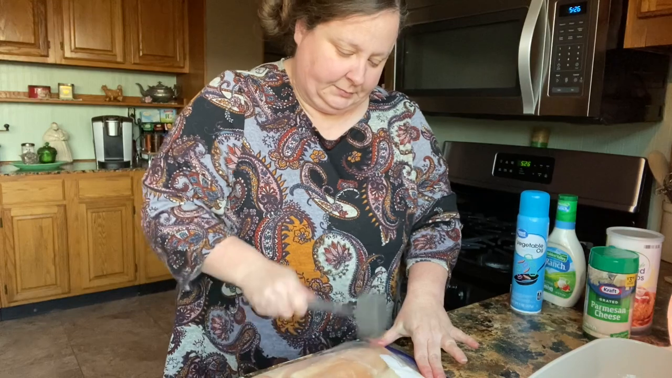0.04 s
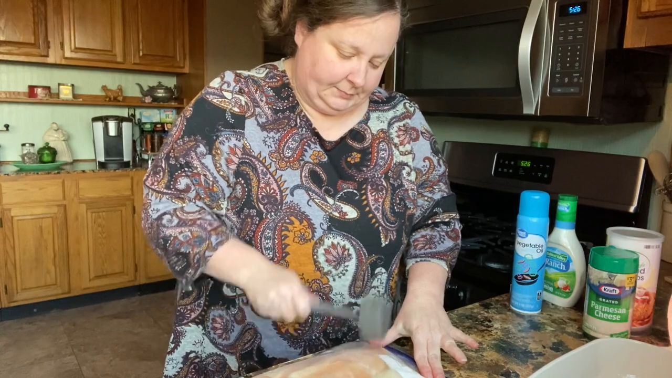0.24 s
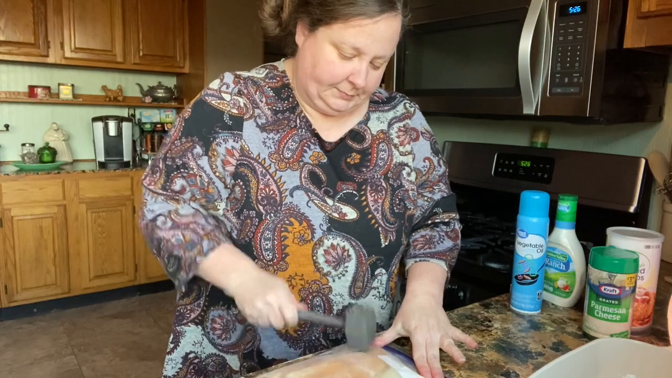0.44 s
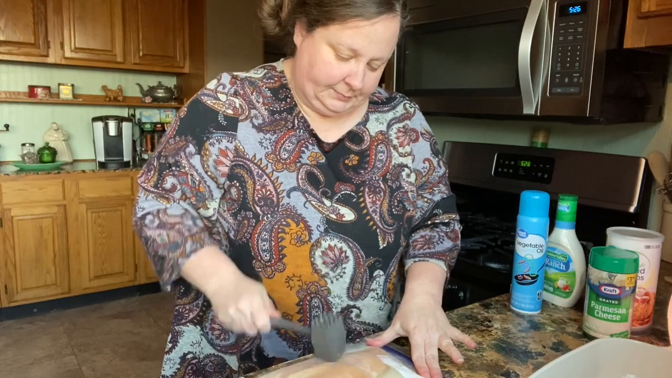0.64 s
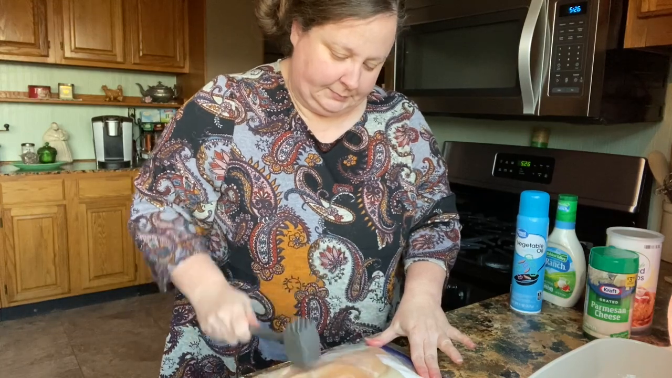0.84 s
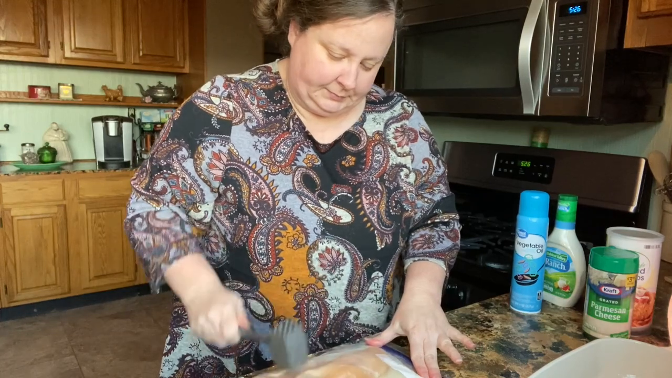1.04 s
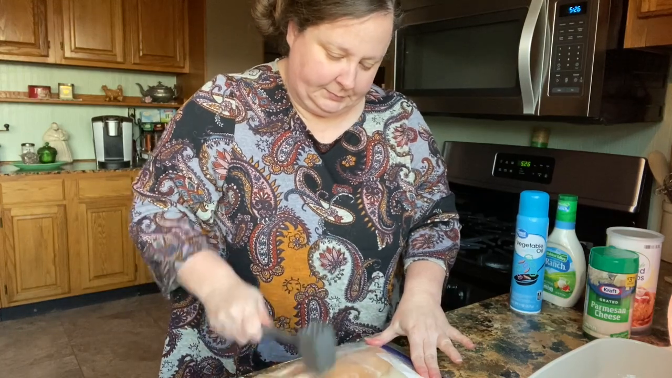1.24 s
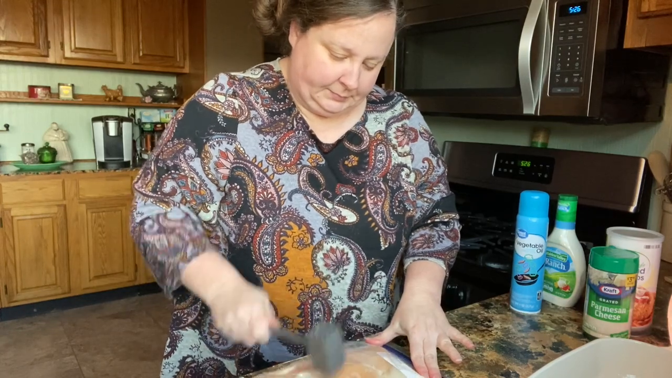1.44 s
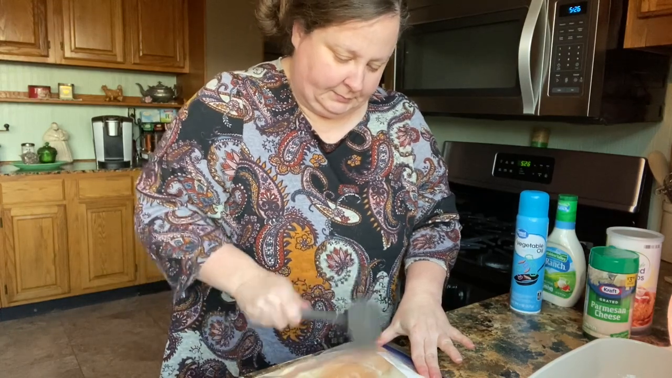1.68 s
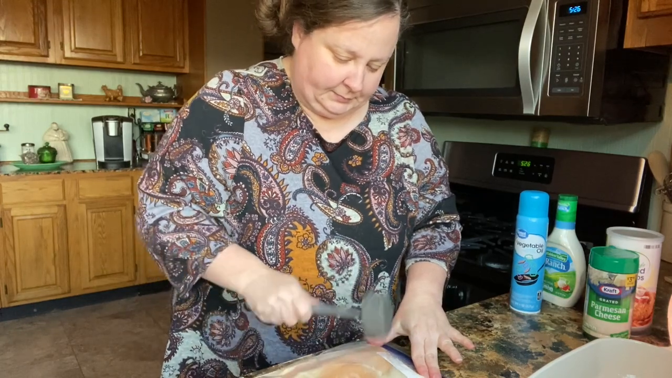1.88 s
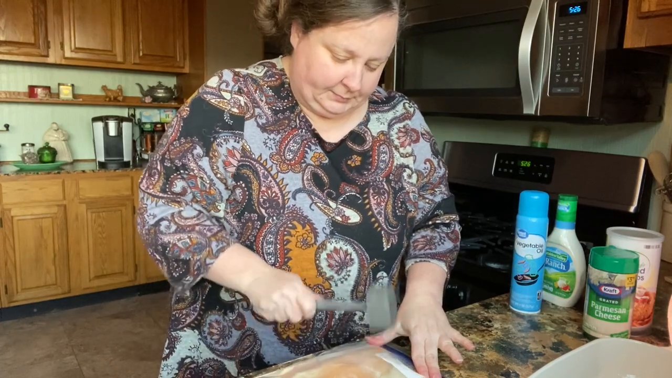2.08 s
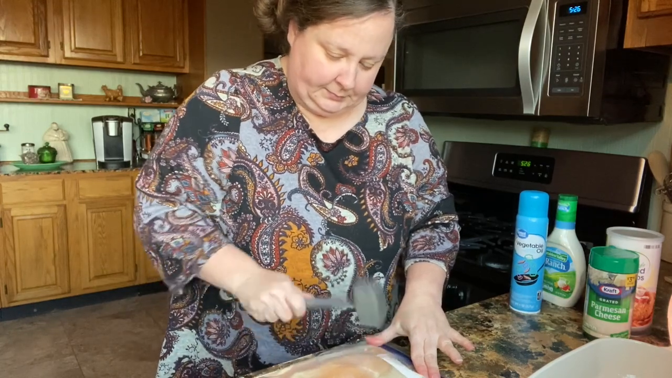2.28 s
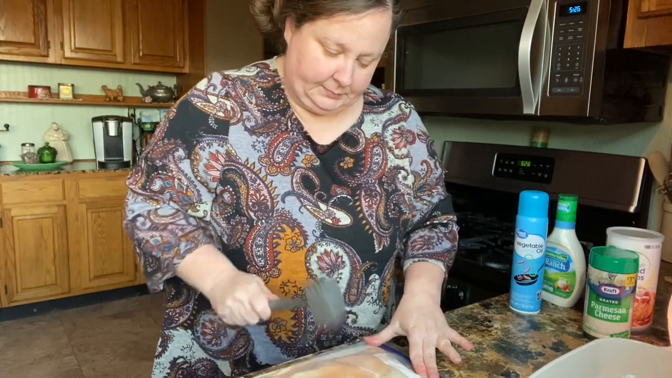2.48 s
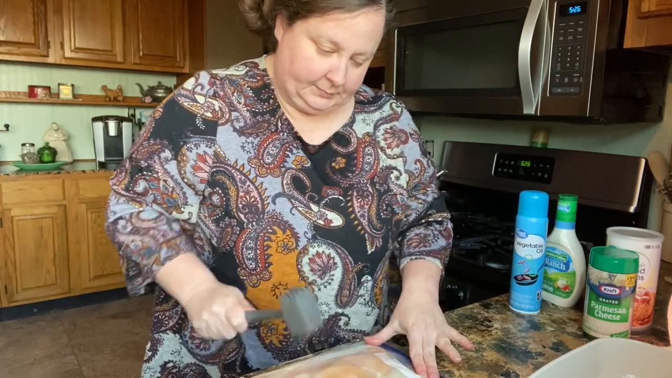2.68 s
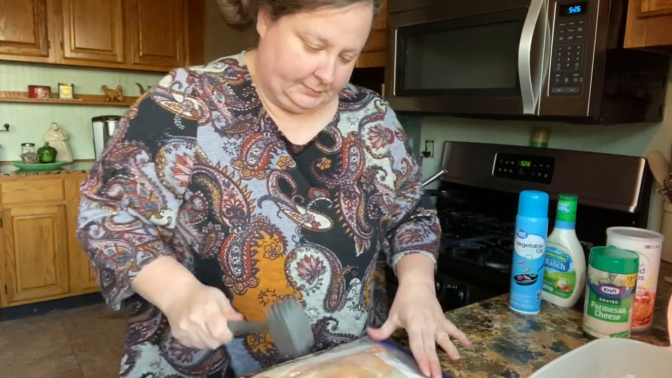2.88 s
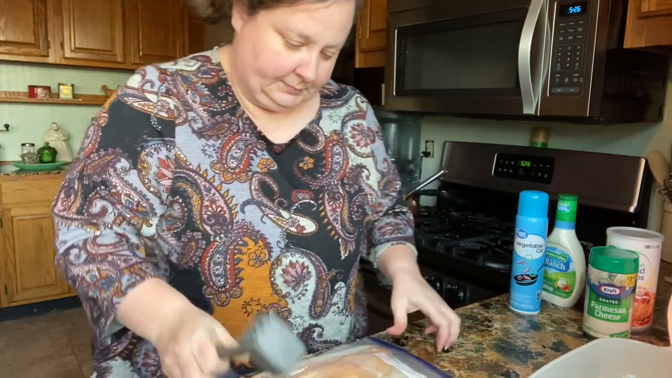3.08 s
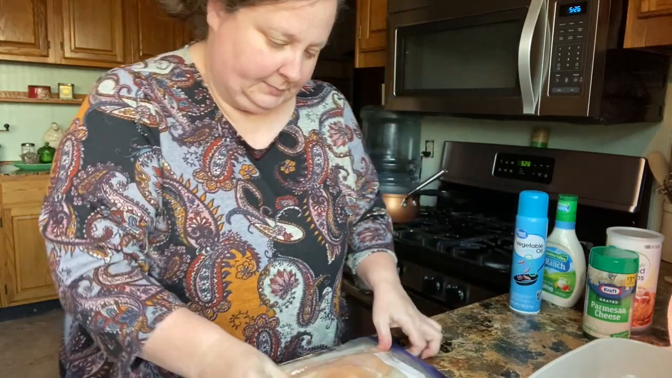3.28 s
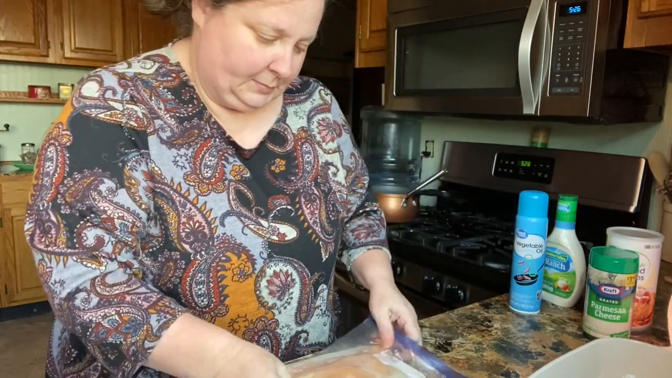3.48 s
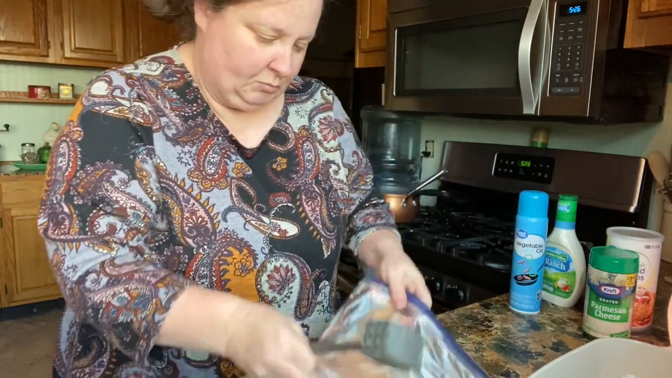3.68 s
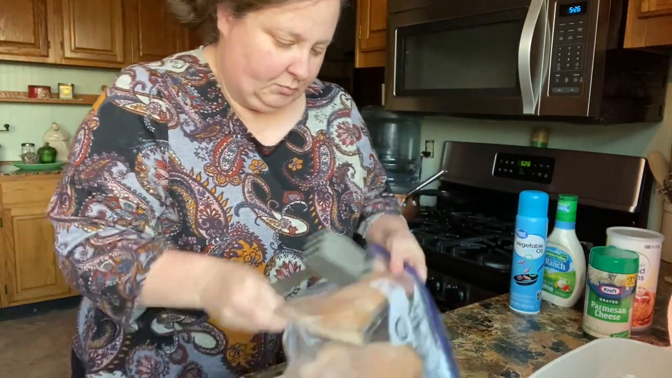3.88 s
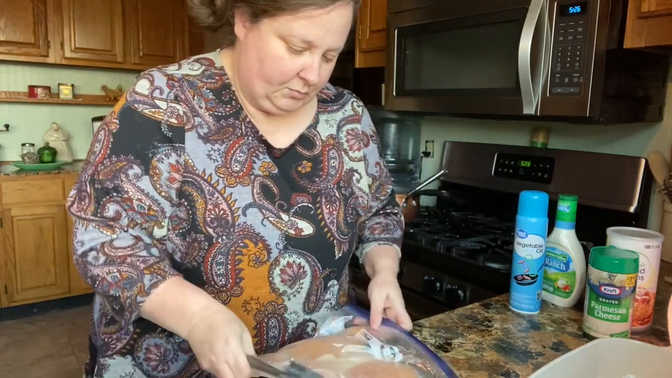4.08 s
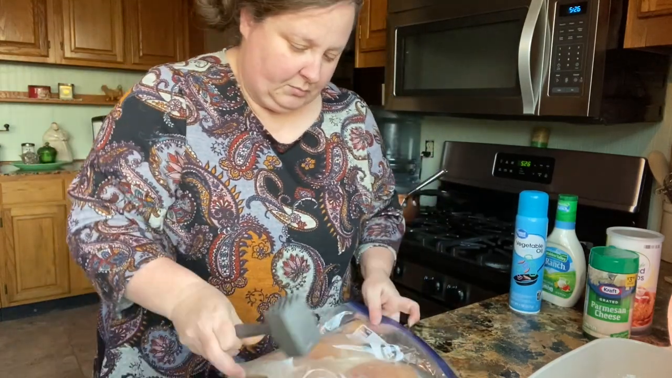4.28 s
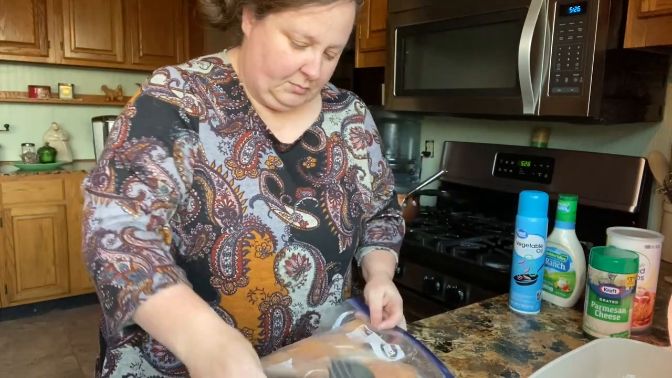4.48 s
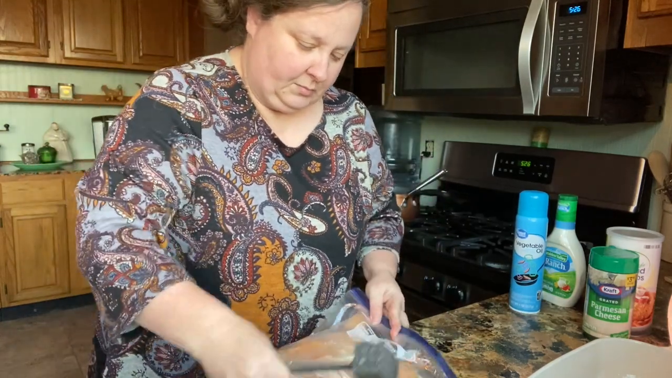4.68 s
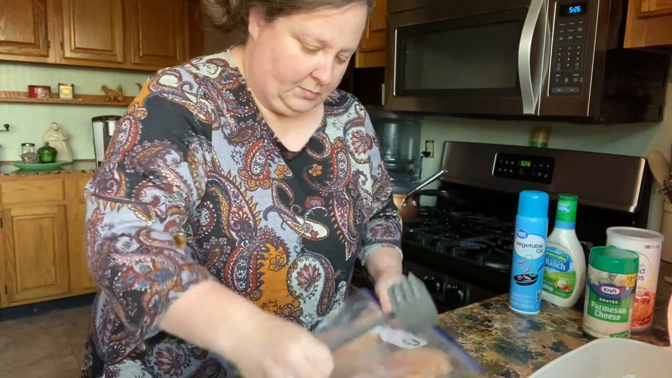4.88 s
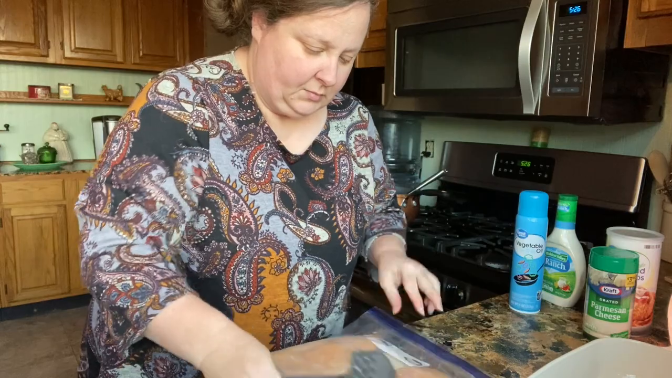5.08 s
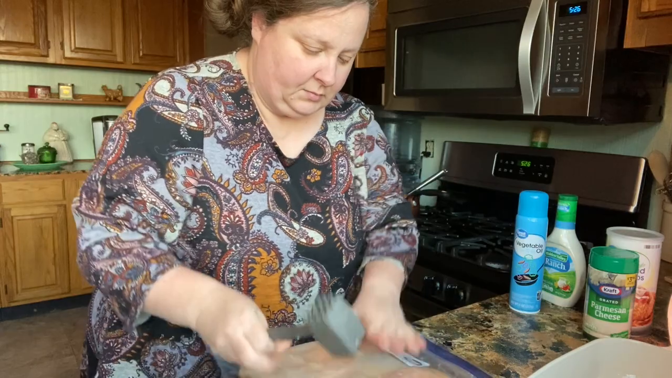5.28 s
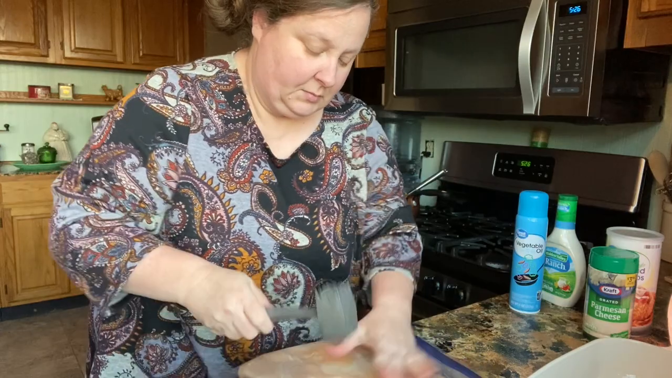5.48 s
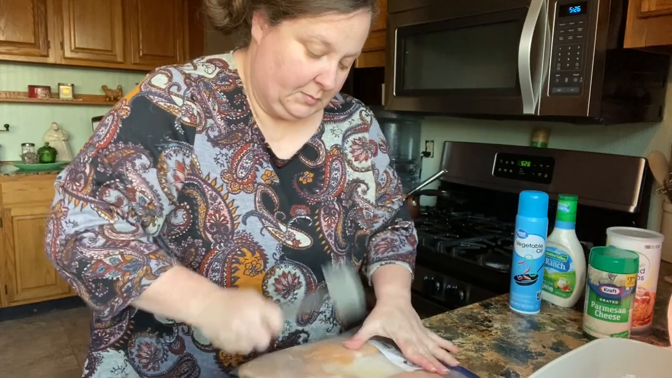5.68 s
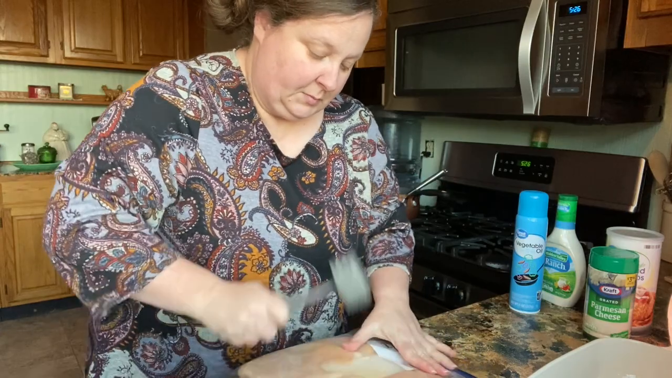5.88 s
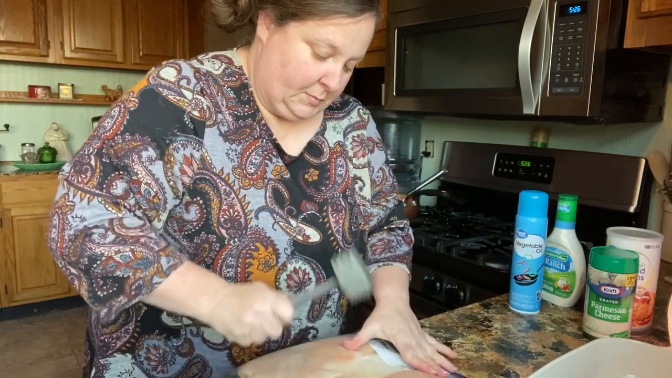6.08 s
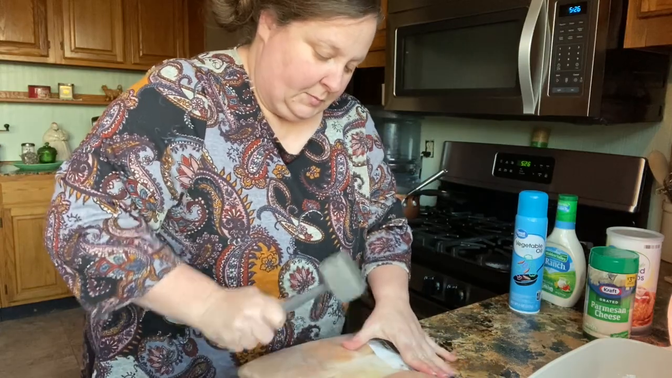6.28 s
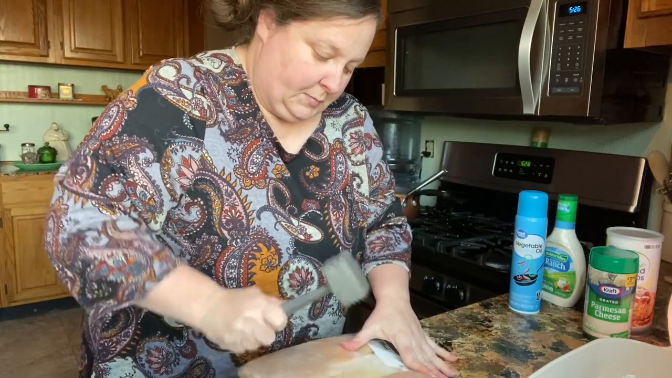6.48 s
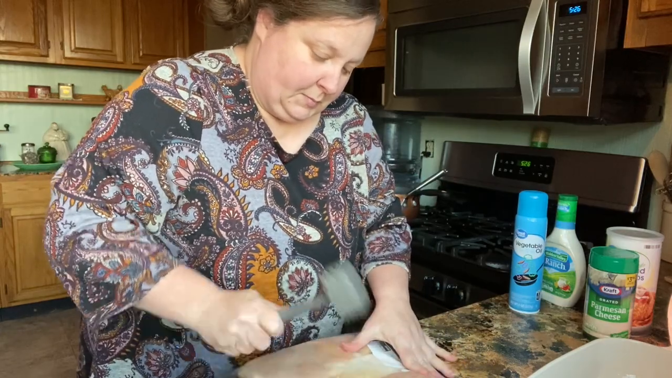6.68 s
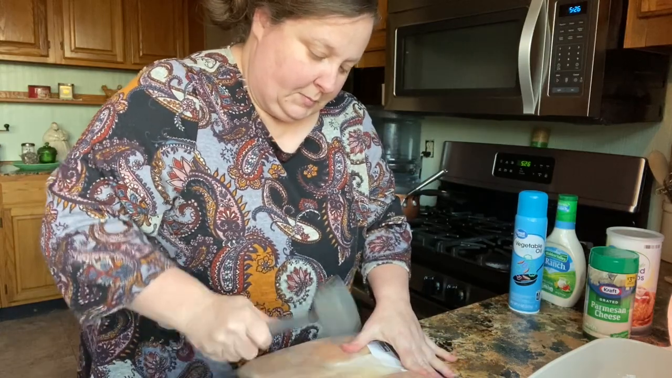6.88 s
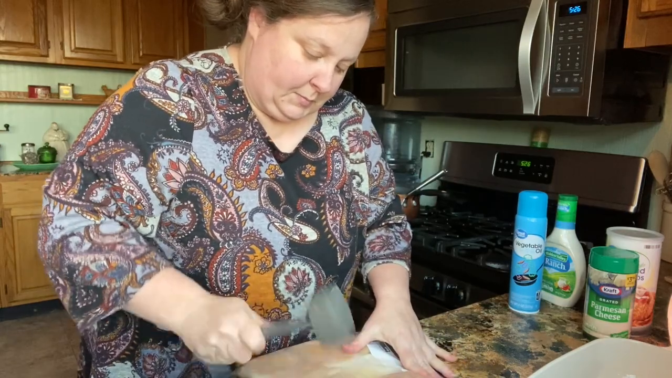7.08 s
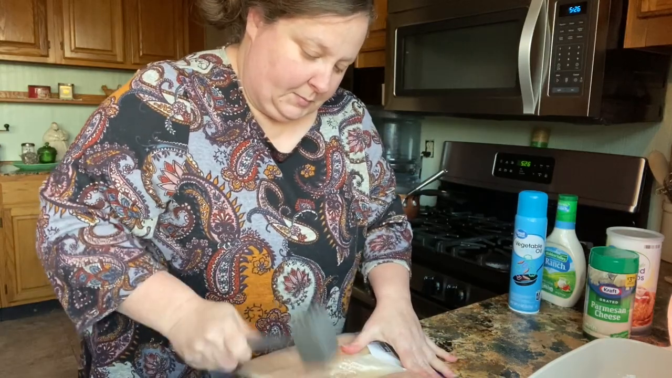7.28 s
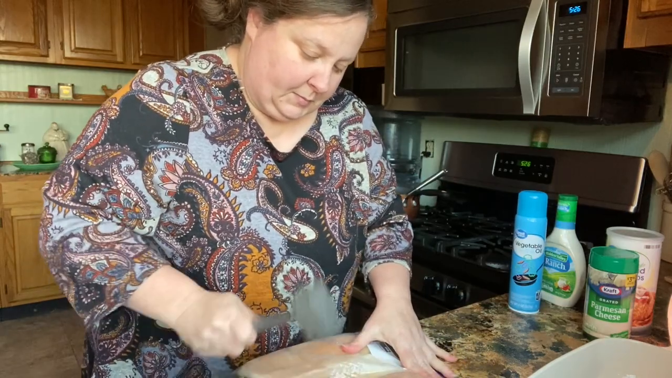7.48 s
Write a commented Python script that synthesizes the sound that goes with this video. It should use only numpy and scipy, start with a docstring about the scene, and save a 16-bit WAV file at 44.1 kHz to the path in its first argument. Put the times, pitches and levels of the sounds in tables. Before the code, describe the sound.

A meat mallet strikes chicken in a plastic bag, about five blows a second, each a wet slap with a woody counter knock and low cabinet boom. The blows weaken and stop; the bag crinkles, snaps and flops softly as it is shifted, with one light tap. Then firm, heavier pounding resumes to the end. Close stereo microphone in a lively kitchen with a faint low murmur.

```python
"""A meat mallet pounds chicken in a plastic bag on a kitchen counter, about five blows a second.
Each blow puffs air from under the film, slaps the meat, then pushes through to the counter and its cabinet.
Between the two runs the bag is lifted, turned and dropped back, crinkling, with one soft blow on the way.
Slaps and crinkles are coloured random clicks, knocks and booms are ringing modes, the thump is a smooth pulse.
A lively kitchen answers it all with decaying noise, over a quiet low murmur."""
import sys
import numpy as np
from scipy import signal
from scipy.fft import rfft, irfft, next_fast_len
from scipy.io import wavfile
from scipy.ndimage import uniform_filter1d

SR = 44100
rng = np.random.default_rng(int(sys.argv[2]) if len(sys.argv) > 2 else 0)


def wrap_up_sound(samples):
    """Save the sound to the file named by the first command line argument, as 16-bit audio."""
    columns = np.atleast_2d(samples).T
    # keep every value between -1 and 1, then stretch to whole-number steps
    tamed = np.clip(columns, -1, 1)
    steps = np.round(tamed * 32767).astype(np.int16)
    wavfile.write(sys.argv[1], SR, steps)


N = 332543   # samples in the scene

# murmur of the still kitchen: (frequency [Hz], relative density [dB])
MURMUR = [(25, -22.5), (50, -8), (76, 1), (115, -12.5), (300, -11), (420, -11), (700, -25.5), (2300, -37),
          (7600, -48), (11000, -73.5), (15000, -82.5)]
# mallet blows: (time [s], slap level [dB], level of the puff of trapped air [dB], thump level [dB], air pocket [Hz])
BLOWS = [(-0.1, -11.5, -24, -21.5, 966), (0.1098, -11.5, -22.5, -19.5, 930),
         (0.3224, -13.5, -22, -23.5, 920), (0.5305, -13.5, -22.5, -19.5, 920),
         (0.739, -18.5, -18.5, -20.5, 970), (0.9409, -16, -18, -21, 2540), (1.1359, -23, -36, -24.5, 2250),
         (1.333, -21.5, -42, -19, 840), (1.5358, -12, -18, -17, 2500), (1.7337, -13.5, -27.5, -22, 1000),
         (1.9202, -17, -31, -25, 2120), (2.1174, -23, -27.5, -30.5, 2290),
         (2.309, -18.5, -25.5, -19.5, 880), (2.505, -24, -38, -27.5, 800), (2.6796, -27, -54, -34, 2070),
         (5.272, -31.5, -40.5, -46.5, 2270), (5.66, -16, -23.5, -17, 1800),
         (5.866, -11.5, -23, -15.5, 2600), (6.073, -13, -23.5, -16.5, 2150),
         (6.2823, -10.5, -15, -15.5, 1290), (6.483, -13, -18, -14.5, 2060), (6.6966, -11, -17.5, -13, 900),
         (6.8981, -12.5, -19, -11.5, 1940), (7.107, -16, -18, -12.5, 2300),
         (7.3241, -13.5, -19.5, -13.5, 2880), (7.5069, -14, -22, -15, 2130)]
# wet film under the mallet, before brightening: (frequency [Hz], relative density [dB])
WET_FILM = [(250, -0.5), (500, 1.5), (700, -8.5), (930, 3), (1200, -3.5), (1700, -1), (2400, 1),
            (3300, -4.5), (4300, -4), (5400, -8), (6700, -9.5), (8800, -11), (10700, -21), (13500, -21.5),
            (15000, -32), (16500, -55.5)]
# modes of the counter top: (frequency [Hz], relative level [dB], t60 [s])
COUNTER_MODES = [(208.3, -10, 0.037), (265.4, -1.5, 0.042), (302.5, -0.5, 0.046), (344.3, 0, 0.055),
                 (399.6, -2.5, 0.056), (474.3, -7.5, 0.066), (958, -6.5, 0.039)]
# modes of the cabinet under it: (frequency [Hz], relative level [dB], t60 [s])
CABINET_MODES = [(59.2, 2, 0.31), (71.5, -7.5, 0.26), (83.1, -7.5, .27), (114, -6.5, 0.12),
                 (141, -9.5, .16)]
# a dish on the counter rings along: (frequency [Hz], relative level [dB], t60 [s])
DISH_MODES = [(706, 0, 0.36)]
# the bag slaps back as the mallet rebounds: (time [s], level before the rebound trim [dB])
REBOUNDS = [(0.7791, -18.5), (1.1887, -16.5), (1.3789, -15.5), (2.7267, -19.5), (5.7059, -13),
            (6.93, -13.5), (7.3588, -11)]
# moves of the hand on the bag (let go, grab, lift, turn, smooth): (time [s], length [s], strain level [dB])
MOVES = [(2.811, .07, -61), (3.159, 0.28, -55), (3.438, 0.23, -46.5), (3.789, 0.15, -40),
         (4.053, 0.13, -59), (4.367, 0.33, -54.5), (4.641, 0.12, -43.5), (4.805, 0.12, -40),
         (5.054, 0.12, -55), (5.283, 0.054, -44), (5.54, 0.038, -59.5)]
# dry film crinkling: (frequency [Hz], relative density [dB])
DRY_FILM = [(400, -8.5), (1200, -1), (2500, 3), (3500, 1.5), (8500, -3.5), (10700, -5), (13800, -11.5),
            (15200, -15), (16500, -35)]
# film sliding on the counter: (frequency [Hz], relative density [dB])
SLIDING_FILM = [(60, -3), (350, 0), (650, -8.5), (900, -3.5), (1500, -10), (2500, -5.5), (4000, -25.5)]
# the loudest creases that snap: (time [s], level before the snap trim [dB], ring frequency [Hz])
SNAPS = [(2.8742, -40, 2750), (3.14, -38, 2710), (3.1726, -37, 2470), (3.251, -32, 2000),
         (3.2889, -34.5, 2830), (3.3403, -31.5, 1860), (3.3925, -36, 2120), (3.461, -34, 2200),
         (3.7567, -33.5, 2440), (3.8065, -37, 2280), (3.8342, -23.5, 2460), (4.145, -37.5, 1570),
         (4.259, -36.5, 2460), (4.375, -39, 2570), (4.431, -39, 1970), (4.4643, -31.5, 2510),
         (4.5281, -38, 1840), (4.5911, -32.5, 2860), (4.6665, -32, 2630), (4.721, -28, 2640),
         (4.812, -26, 2460), (4.8944, -36, 2200), (5.0684, -36, 2740), (5.149, -31.5, 2000),
         (5.4005, -41, 2430)]
# meat flopping onto the counter: (time [s], knock level [dB], boom level [dB])
FLOPS = [(3.885, -40.5, -36), (3.95, -44, -39), (4.468, -47, -45), (4.84, -51, -45), (4.949, -63, -40.5),
         (5.32, -65, -41)]
# echoes of the kitchen: (frequency [Hz], relative level [dB], t60 [s], left-right likeness [-1 to 1])
ROOM = [(60, -17.5, .3, 0.62), (130, -5.5, 0.34, 1), (213, -5.5, 0.24, 0.53), (343.6, 0, .31, .05),
        (560, -2, 0.28, 0.36), (1100, 0, .34, .05), (2400, -3.5, .33, .05), (4570, -4.5, 0.34, .1),
        (8000, -9, .26, 1), (14000, -13.5, 0.25, .9)]
# likeness of the direct sound in the two ears: (frequency [Hz], likeness [-1 to 1])
DIRECT = [(200, .85), (550, 0.24), (1100, .6), (2200, 0.47), (4000, 0.19), (5800, 0.34), (8000, 1),
          (14000, 1)]
# the two microphone ports: (frequency [Hz], phase by which the left leads [rad])
PORTS = [(350, 0.21), (560, -2), (900, -1.5), (1400, -0.95), (2600, -0.7), (4500, -2.5), (6500, -1.5),
         (7700, -0.07), (9200, 1.35), (10700, 3.5), (13700, 8)]

SIZE = 24576   # samples in one blow and its tail
AGE = np.arange(SIZE) / SR   # seconds
FIRM_SLAP_DB, FIRM_THUMP_DB = -13, -20   # a firm blow, from which the rules below count
SLAP_S, SLAP_HALVES_DB = 0.0045, 24.5   # a faster mallet slaps more briefly
# time to push through the meat, shorter when slap and thump are stronger; never above the longest
SINK_S, SINK_HALVES_DB, LONGEST_SINK_S = 0.0115, 22, 0.015
KNOCK_DB, KNOCK_PER_SLAP, KNOCK_PER_THUMP = -19.5, 0.67, 0.14   # the counter top follows both (dB per dB)
BOOM_DB, BOOM_KNEE_DB = -18, -29.0   # the cabinet booms almost alike for thumps well above the knee
BARE_BRIGHT_DB, CUSHION_DULLS_DB = -1, 5   # a cushion of air under the film dulls the slap
MOVE_ATTACK_S, MOVE_RELEASE_S = 0.021, 0.037   # the film takes up the strain, then settles
SLIDE_DB, SLIDE_PER_CRINKLE = -54, 0.74   # sliding under a strain of -50 dB, and its growth (dB per dB)
CUTOFF_HZ = 16800


def from_db(db):
    """Turn decibels into an amplitude factor."""
    return 10 ** (np.asarray(db) / 20)


def rms_one(x):
    """Scale to rms 1."""
    return x / np.sqrt(np.mean(x ** 2) + 1e-20)


def at_level(x, db, span):
    """Give a short sound the energy of a level held for span seconds."""
    return rms_one(x) * from_db(db) * np.sqrt(span * SR / x.shape[-1])


def at_hz(table, hz, axis=1):
    """Read one column of a table on a log-frequency axis."""
    table = np.array(table)
    return np.interp(np.log(hz + 1e-9), np.log(table[:, 0]), table[:, axis])


def add(out, s, sound):
    """Mix a sound in from time s on."""
    start = round(s * SR)
    first, last = max(start, 0), min(start + sound.shape[-1], out.shape[-1])
    if last > first:
        out[:, first:last] += sound[..., first - start:last - start]


def stereo(mid, side, alike):
    """Two unrelated sounds become a pair of the given likeness."""
    alike = np.clip(alike, -1, 1)
    return np.sqrt((1 + alike) / 2) * mid + np.sqrt((1 - alike) / 2) * np.array([side, -side])


def colour(pair, spectrum):
    """Shape two unrelated sounds by a spectrum and spread them like the direct sound; rms 1."""
    length = pair.shape[-1]
    size = next_fast_len(length)
    hz = np.fft.rfftfreq(size, 1 / SR)
    spread = stereo(*rfft(pair, size), at_hz(DIRECT, hz))
    shaped = spread * from_db(at_hz(spectrum, hz))
    return rms_one(irfft(shaped, size)[:, :length])


def lowpass(x, hz):
    """Roll off the treble gently, 6 dB per octave."""
    return signal.sosfilt(signal.butter(1, hz, fs=SR, output="sos"), x)


def resonance(x, hz, width_hz):
    """Two-pole resonance with gain about 1 on top."""
    r = np.exp(-np.pi * width_hz / SR)
    feed = np.array([1, 0, -1]) * (1 - r * r) / 2
    feedback = [1, -2 * r * np.cos(2 * np.pi * hz / SR), r * r]
    return signal.lfilter(feed, feedback, x)


def grains(per_s, spread_db, size):
    """Random clicks of uneven strength, at the same moments in both channels."""
    sizes = from_db(spread_db * np.minimum(rng.exponential(1, size), 4))
    struck_now = rng.random(size) < per_s / SR
    return struck_now * sizes * rng.standard_normal((2, size))


def still_kitchen():
    """The quiet kitchen is steady noise, weighted to the bass."""
    return from_db(-57.5) * colour(rng.standard_normal((2, N)), MURMUR)


def mallet():
    """The blows and the film's rebounds together."""
    out = np.zeros((2, N))
    pound(out)
    rebound(out)
    return out


def pound(out, dish_db=-24.5, pocket_db=2.0, pocket_width=0.087, lead_s=0.03):
    """Every blow lands on a new spot: slap, thump, knock and boom, with the dish shaken along."""
    for s, db, puff_db, thump_db, pocket_hz in BLOWS:
        length_s, sink_s, bright_db, knock_db, boom_db = blow(db, puff_db, thump_db)
        film = slap(db, length_s, bright_db, puff_db, lead_s)
        # the trapped air rings
        pocket = from_db(pocket_db) * resonance(film, pocket_hz, pocket_width * pocket_hz)
        push = lead_s + sink_s
        body = counter(SIZE, push, knock_db, boom_db)
        body = body + thump(push, thump_db) * from_db([[-0.4], [0.4]])
        add(out, s - lead_s, film + pocket + body + reflected(all_round(film) + body))
        dish = at_level(struck(DISH_MODES, 2.0, 0.003), knock_db + dish_db, 0.04)
        add(out, s + sink_s, dish * np.array([[1], [-0.6]]))   # opposite phase on the right


def blow(db, puff_db, thump_db):
    """Levels of a blow set its slap length [s], sinking time [s], and brightness, knock and boom [dB]."""
    speed, push = db - FIRM_SLAP_DB, thump_db - FIRM_THUMP_DB
    length_s = SLAP_S * 2 ** (-speed / SLAP_HALVES_DB)
    sink_s = SINK_S * 2 ** (-(speed + push) / SINK_HALVES_DB)
    bright_db = BARE_BRIGHT_DB - CUSHION_DULLS_DB * from_db(puff_db - db)
    knock_db = KNOCK_DB + KNOCK_PER_SLAP * speed + KNOCK_PER_THUMP * push
    boom_db = BOOM_DB - 10 * np.log10(1 + from_db(BOOM_KNEE_DB - thump_db) ** 2)
    return length_s, min(sink_s, LONGEST_SINK_S), bright_db, knock_db, boom_db


def slap(db, length_s, bright_db, puff_db, lead_s, puff_s=0.0045, touch_s=0.0073, tilt=0.46, sharp=0.44,
         peel_db=-22.5, peel_s=0.0409):
    """The face touches the bag and squeezes air out, the film smacks the meat, and it peels off as the mallet lifts."""
    since = AGE[:SIZE // 6] - lead_s
    spectrum = []
    for hz, level in WET_FILM:
        octaves = np.clip(np.log2(hz / 2500), -1, 1.5)
        spectrum.append((hz, level + tilt * (bright_db + 5) * octaves))
    spray = colour(grains(20000, 1.2, len(since)), spectrum)
    dull = lowpass(spray, 3500)

    swell = np.exp(np.minimum(since, 0) / puff_s)
    puff = (since < 0) * swell * np.where(since > -touch_s, spray, 0.14 * dull)   # faint until the touch
    fade = np.exp(-np.maximum(since, 0) / (1.38 * length_s))
    smack = (since >= 0) * (dull * fade + (spray - dull) * fade ** (1 / sharp))   # the treble dies first
    lift_s = peel_s + rng.normal(0, 0.0031)
    peel = dull * np.exp(-((since - lift_s) / 0.004) ** 2)

    sound = at_level(puff, puff_db, 0.005)
    sound = sound + at_level(smack, db, 0.005 + length_s)
    sound = sound + at_level(peel, db + peel_db, 0.06)
    return np.pad(sound, ((0, 0), (0, SIZE - len(since))))


def thump(s, db, width_s=0.0022):
    """The meat brakes the mallet in one smooth push; the counter radiates its curvature."""
    u = (AGE - s) / width_s
    return at_level((u * u - 1) * np.exp(-u * u / 2), db, 0.024)


def counter(size, s, knock_db, boom_db, knock_lead_s=0.006465, boom_lead_s=0.0005):
    """The top knocks as the push builds up, the cabinet booms as it lets go."""
    out = np.zeros((2, size))
    knock = at_level(struck(COUNTER_MODES, 2.2, 0.0015), knock_db, 0.018)
    boom = at_level(struck(CABINET_MODES, 1.4, 0.0036), boom_db, 0.07)
    add(out, s - knock_lead_s, knock * from_db([[-2.0], [1.5]]))
    add(out, s - boom_lead_s, boom * from_db([[-0.7], [0.7]]))
    return out


def struck(modes, scatter_db, contact_s):
    """Modes ring with new strengths at each blow; a soft contact rounds the attack."""
    hz, db, t60 = np.array(modes).T[:, :, None]
    level_db = db + scatter_db * rng.standard_normal(db.shape) - 60 * AGE / t60
    rings = from_db(level_db) * np.sin(2 * np.pi * hz * AGE)
    return rings.sum(0) * (1 - np.exp(-AGE / contact_s))


def all_round(x, width_hz=540.0):
    """The room gathers a slap from every direction, so the ripples of its spectrum even out."""
    spectrum = rfft(x)
    power = np.abs(spectrum) ** 2 + 1e-20
    even = uniform_filter1d(power.mean(0), size=max(1, round(width_hz * x.shape[-1] / SR)))
    return irfft(spectrum * np.sqrt(np.abs(even) / power)) * (AGE < 0.1)   # the slap stays short


def reflected(x):
    """What the kitchen sends back of a sound."""
    return signal.fftconvolve(x, kitchen_echo(), axes=-1)[:, :x.shape[-1]]


def kitchen_echo(first_s=0.0035, build_s=0.0013, hold_s=0.015):
    """Echoes for one spot on the counter: they thicken, hold briefly between near walls, then die band by band."""
    out = 0
    edges = 40 * 2 ** np.arange(0, 9.1, 0.75)   # bands of three quarters of an octave [Hz]
    white = rng.standard_normal((2, 2, SIZE))
    onset = 1 - np.exp(-np.maximum(AGE - first_s, 0) / build_s)
    for k, (low, high) in enumerate(zip(edges, edges[1:])):
        hz = np.sqrt(low * high)
        band_filter = signal.butter(2, [low, high], "band", fs=SR, output="sos")
        mid, side = signal.sosfilt(band_filter, white[k % 2])
        fade = onset * from_db(-60 * np.maximum(AGE - hold_s, 0) / at_hz(ROOM, hz, axis=2))
        band = stereo(rms_one(mid * fade), rms_one(side * fade), at_hz(ROOM, hz, axis=3))
        out = out + band * from_db(at_hz(ROOM, hz)) * np.sqrt(2 * (high - low) / SR / SIZE)
    return out


def in_kitchen(x):
    """Direct sound plus its echoes."""
    return x + reflected(x)


def rebound(out, rebound_db=-4.5, flap_s=0.005, flap_hz=4000.0):
    """The slack film slaps back as a short, duller burst of clicks."""
    for s, db in REBOUNDS:
        flap = colour(grains(9500, 1.5, SIZE), WET_FILM) * np.exp(-AGE / flap_s)
        flap = lowpass(flap, flap_hz)
        add(out, s, in_kitchen(from_db(db + rebound_db) * flap))


def bag(crinkle_db=-1.5, snap_db=-3.0):
    """The film crinkles, slides on the counter and snaps, and the meat flops down."""
    strain_db = strain()
    film = crinkles(strain_db) * from_db(strain_db + crinkle_db)
    film += slide(strain_db)
    for s, db, hz in SNAPS:
        add(film, s, snap(db + snap_db, hz))
    for s, knock_db, boom_db in FLOPS:
        film += counter(N, s, knock_db, boom_db)
    return in_kitchen(film)


def strain():
    """How hard the bag is worked, in dB: each move rises, holds and settles."""
    t, total = np.arange(N) / SR, 1e-7
    for s, length_s, db in MOVES:
        rise = np.clip((t - s) / MOVE_ATTACK_S, 0, 1)
        settle = np.exp(-np.maximum(t - s - length_s, 0) / MOVE_RELEASE_S)
        total = total + from_db(db) * rise * settle
    return 20 * np.log10(total)


def crinkles(level_db, per_s=120.0, spread_db=3.5, flicker_db=6.0, ring_db=7.0, count=9):
    """Patches of film buckle in clumps, faster when worked harder, each ringing at its own pitch; rms 1."""
    rate = per_s * from_db(0.6 * (np.clip(level_db, -65, -30) + 48.5))   # clicks per second
    out = 0
    for hz in np.geomspace(1300, 7500, count):
        drift = uniform_filter1d(rng.standard_normal(N), size=700)
        clumps = from_db(flicker_db * rms_one(drift))
        clicks = grains(rate, spread_db, N) * clumps / np.sqrt(rate) + 1e-18
        out = out + clicks + from_db(ring_db) * resonance(clicks, hz, 0.1 * hz)
    return colour(out, DRY_FILM)


def slide(strain_db):
    """Sliding film is a dense run of uneven clicks that swells less steeply than the strain."""
    level_db = SLIDE_DB + SLIDE_PER_CRINKLE * (strain_db + 50)
    return colour(grains(4400, 4.1, N), SLIDING_FILM) * from_db(level_db)


def snap(db, ring_hz, crack_s=0.00086, crunch_s=0.0093, crunch_db=-8.5, pop_db=-10.0, pop_s=0.004):
    """A crease flips with a crack and a short crunch, and the stiff patch of film around it rings."""
    age = AGE[:SIZE // 16]
    crack = colour(rng.standard_normal((2, len(age))), DRY_FILM) * np.exp(-age / crack_s)
    crunch = colour(grains(2500, 3.2, len(age)), DRY_FILM)
    crunch = rms_one(crunch + 2.1 * resonance(crunch, ring_hz, 460)) * np.exp(-age / crunch_s)
    pop = np.sin(2 * np.pi * ring_hz * age) * np.exp(-age / pop_s)
    return from_db(db) * (crack + from_db(crunch_db) * crunch + from_db(pop_db) * pop)


def scene():
    """Mallet and bag in one room, over its quiet murmur."""
    return still_kitchen() + mallet() + bag()


def ports(x):
    """Each frequency reaches the two ports a little out of step."""
    size = next_fast_len(N + SIZE)
    lead = at_hz(PORTS, np.fft.rfftfreq(size, 1 / SR))
    turn = np.exp(0.5j * np.array([lead, -lead]))
    return irfft(rfft(x, size) * turn, size)[:, :N]


def record(dry, low_cut_hz=32.0, top=1.0):
    """The microphone thins the deepest bass, the highest peaks are rounded off and the top is cut."""
    low_cut = signal.butter(2, low_cut_hz, "high", fs=SR, output="sos")
    thinned = signal.sosfiltfilt(low_cut, ports(dry))
    rounded = thinned / (1 + (thinned / top) ** 4) ** (1 / 4)
    return signal.sosfilt(signal.cheby2(16, 60, CUTOFF_HZ, fs=SR, output="sos"), rounded)


dry = scene()
out = record(dry)
wrap_up_sound(out)
```